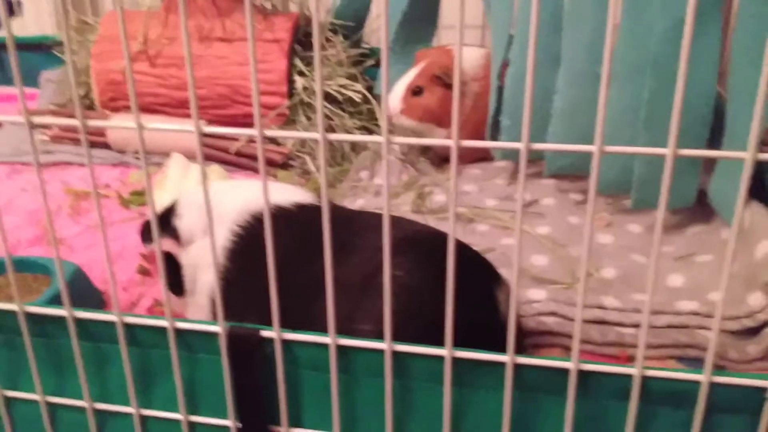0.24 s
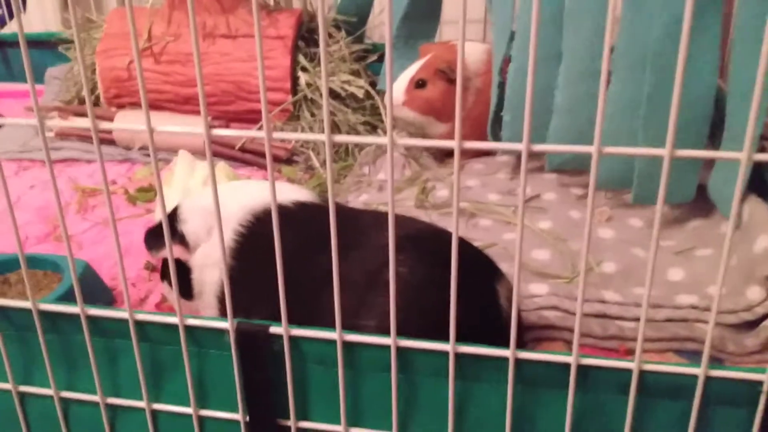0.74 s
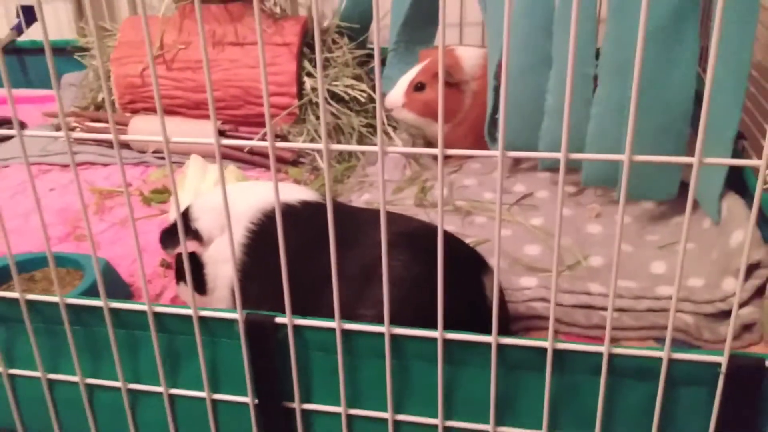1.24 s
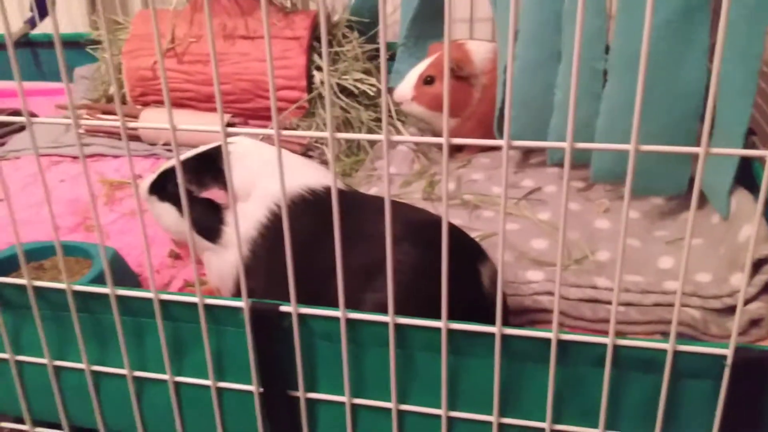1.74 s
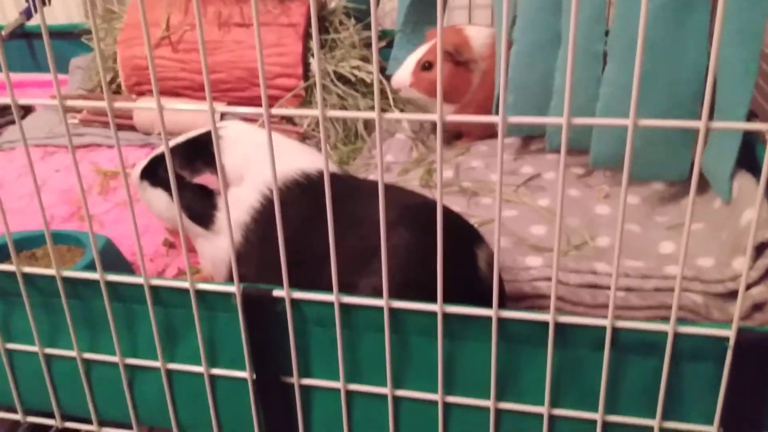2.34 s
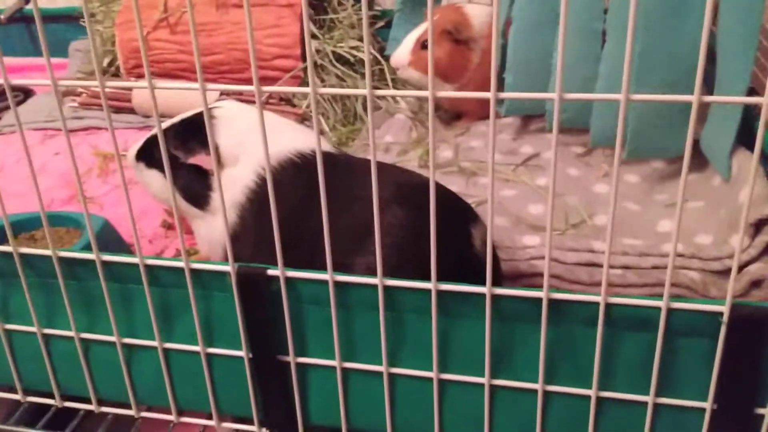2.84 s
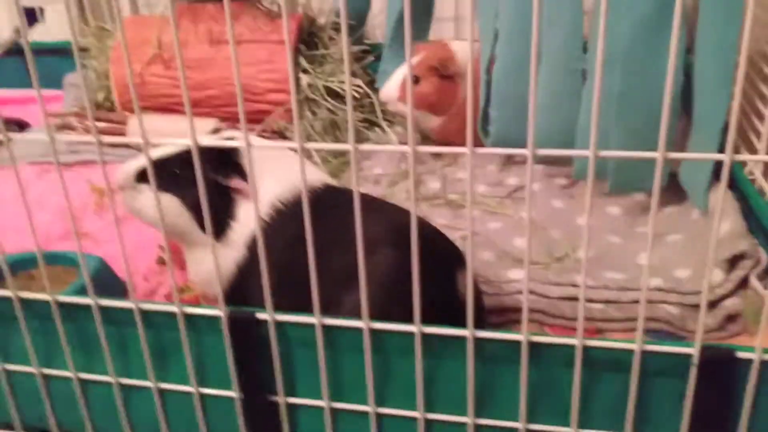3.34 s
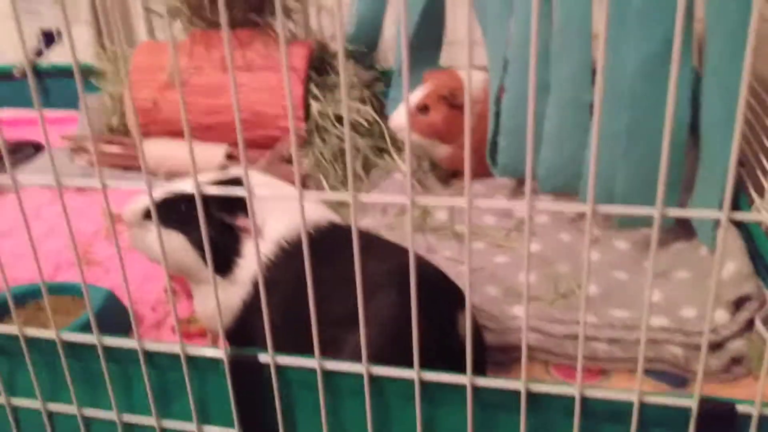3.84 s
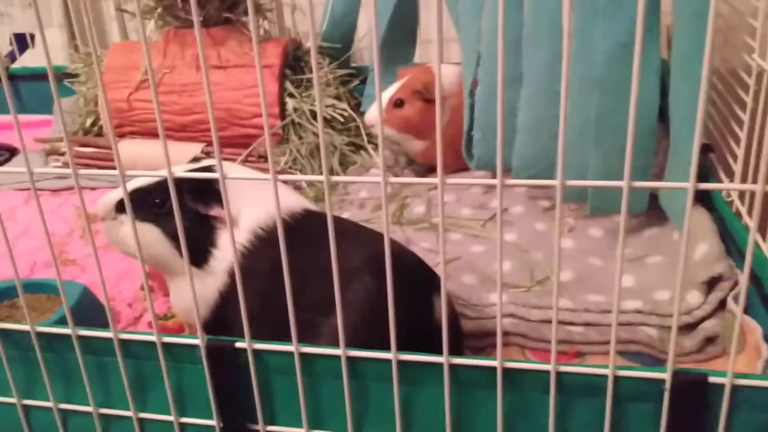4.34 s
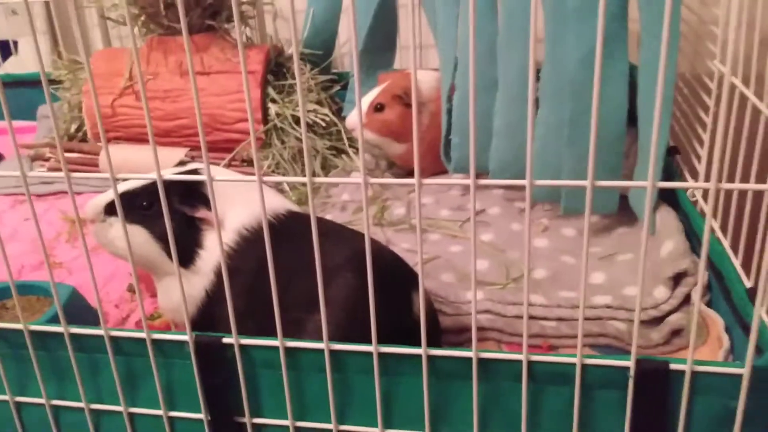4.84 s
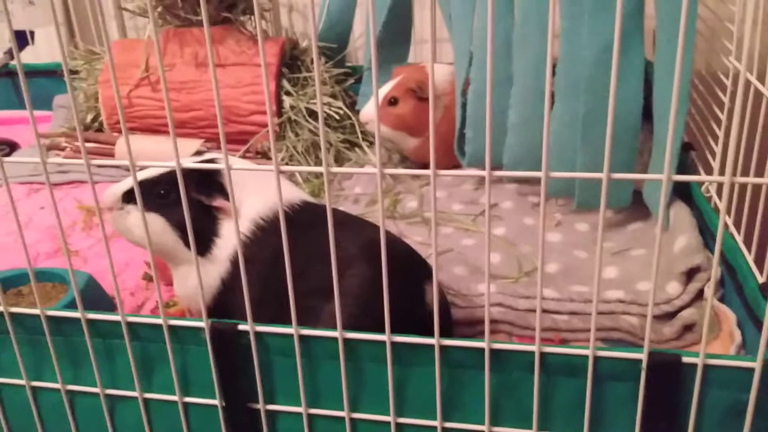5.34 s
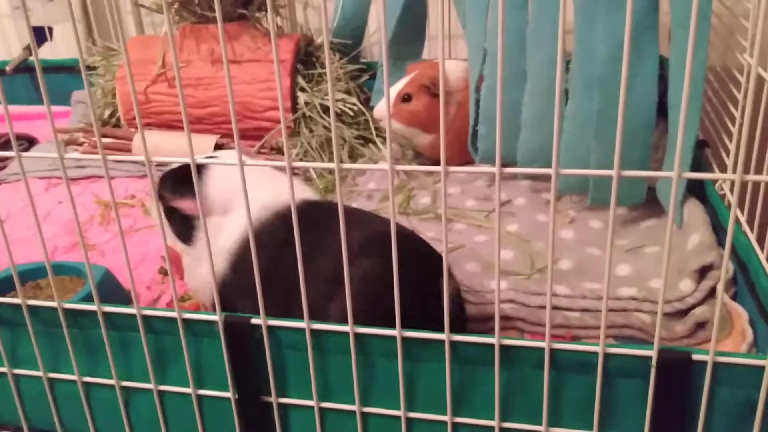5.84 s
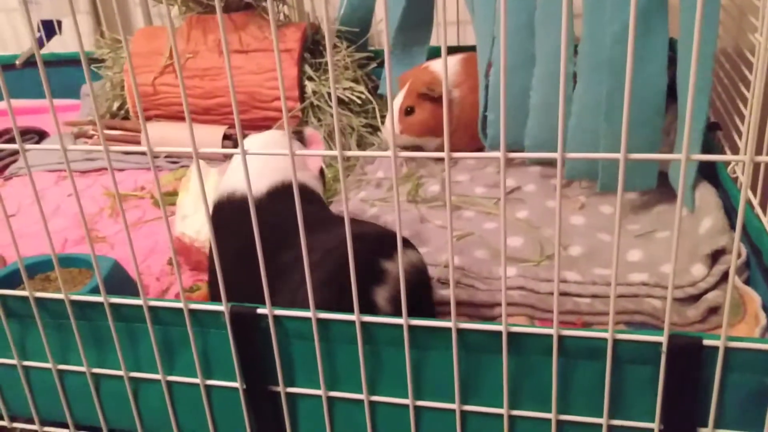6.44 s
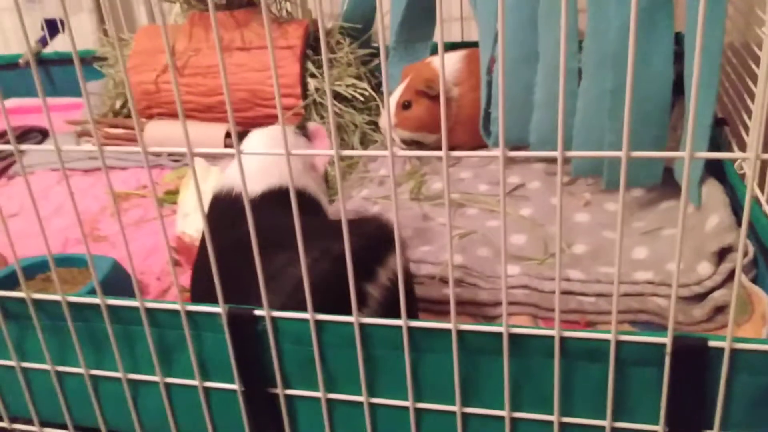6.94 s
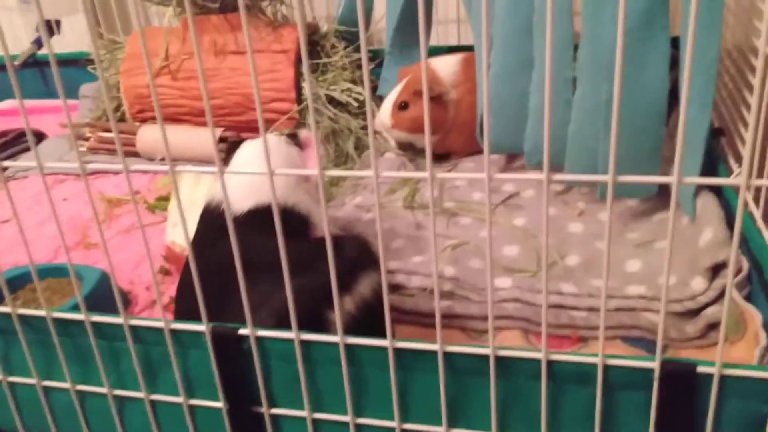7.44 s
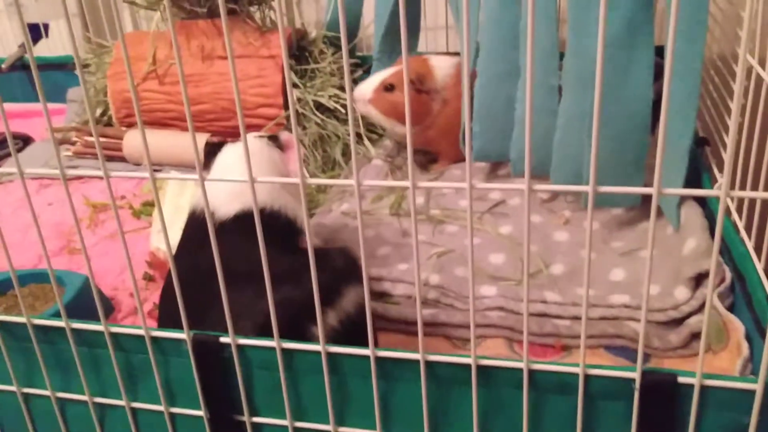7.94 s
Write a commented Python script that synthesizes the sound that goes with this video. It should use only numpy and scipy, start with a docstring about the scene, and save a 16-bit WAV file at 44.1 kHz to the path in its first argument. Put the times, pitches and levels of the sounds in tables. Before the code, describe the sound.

A guinea pig roots through dry hay in a cage, stalks snapping and crackling in two bouts, with soft bedding thuds over faint appliance hum.

```python
"""Dry hay stirred close to the microphone, in two bouts: stalks snap, as bursts of splinter pulses
that excite a resonance. Under the snaps lie a dense crackle of decaying grains and a soft rustle of
shaped noise. Bedding thuds on the cage tray as damped modes, and a few swishes pass as resonant noise.
Behind them an appliance hums as steady sine lines in the hiss of the quiet room."""
import sys
import numpy as np
from scipy import signal
from scipy.fft import irfft
from scipy.io import wavfile
from scipy.ndimage import uniform_filter1d

SR = 44100
rng = np.random.default_rng(int(sys.argv[2]) if len(sys.argv) > 2 else 0)


def wav_out(sig):
    """Save sig, one row per channel (or a flat mono array), as 16-bit PCM at SR to the path in sys.argv[1]."""
    wavfile.write(sys.argv[1], SR, np.round(np.clip(np.atleast_2d(sig).T, -1, 1) * 32767).astype(np.int16))


N = 360426


def gain_of(db):
    """Logarithmic level: converts decibels to an amplitude ratio."""
    return 10 ** (np.asarray(db) / 20)


def evened(x):
    """Power normalization: scales to an rms of 1."""
    return x / np.sqrt(np.mean(x ** 2) + 1e-20)


def read(points, hz):
    """Spectral interpolation: reads a table on a log-frequency axis."""
    f, value = np.transpose(points)
    return np.interp(np.log(hz + 1), np.log(f + 1), value)


def follow(peaks, holds, levels_db, rise_db_per_s, fall_db_per_s, sag_db_per_s=0):
    """Power summation: level in dB of overlapping gestures, each a rise, a hold and a fall."""
    t = np.arange(0, N, 64) / SR
    early = np.c_[peaks] - t
    late = t - np.c_[peaks + holds]
    shape_db = -rise_db_per_s * np.maximum(early, 0)
    shape_db -= fall_db_per_s * np.maximum(late, 0)
    shape_db -= sag_db_per_s * np.maximum(-early, 0)
    power = (gain_of(np.c_[levels_db] + shape_db) ** 2).sum(0) + 1e-14
    return np.interp(np.arange(N) / SR, t, 10 * np.log10(power))


def band(x, lo_hz, hi_hz):
    """Band limitation: causal band-pass along the last axis."""
    edges = np.clip([lo_hz, hi_hz], 20, SR / 2 - 100)
    return signal.sosfilt(signal.butter(2, edges, "band", fs=SR, output="sos"), x)


def add(mix, s, sound, pan=0., lag=0.):
    """Interaural differences: a sound reaches the left port lag samples later, pan/4 dB up;
    the right port gets it 1.5 * pan dB down."""
    for side, (sign, shift) in enumerate([(0.5, lag), (-3.0, 0)]):
        start = max(round(s * SR + shift), 0)
        part = mix[side, start:][:len(sound)]
        part += gain_of(sign * pan / 2) * sound[:len(part)]


def hiss(spectrum, same, lead_s, patchy_db, size):
    """Random-phase synthesis: partly coherent stereo noise with drifting spectral patches, rms 1."""
    frames, hz = 4 * N // size + 5, np.fft.rfftfreq(size, 1 / SR)
    left_re, left_im, own_re, own_im, patches = rng.standard_normal((frames, len(hz), 5)).T
    patches = uniform_filter1d(patches, size=8, axis=0)
    patches = evened(uniform_filter1d(patches, size=8, axis=1))
    left, own = left_re + 1j * left_im, own_re + 1j * own_im
    alike = np.clip(read(same, hz), 0, 1)[:, None]
    delay = np.exp(-2j * np.pi * hz * lead_s)[:, None]  # the left port leads by lead_s
    right = alike * delay * left + np.sqrt(1 - alike ** 2) * own
    z = np.array([left, right]) * gain_of(read(spectrum, hz)[:, None] + patchy_db * patches)
    return evened(signal.istft(z, nperseg=size, noverlap=3 * size // 4)[1][:, :N])


# relative spectrum of the room's hiss: (frequency [Hz], density [dB per Hz])
AIR_SPECTRUM = [(30, 0), (60, 1.5), (95, -8), (140, 5.5), (200, -10), (260, 7.5), (310, -10.5), (380, 0),
                (540, -5.5), (680, 3), (870, 0), (1000, -4), (1500, -2.5), (2300, -1), (3000, -14),
                (5600, -23.5), (9000, -28.5), (13500, -25), (15700, -25), (16100, -50)]
AIR_DB = -59.5  # dB rms, before the port balance
# left-right likeness of the hiss: (frequency [Hz], likeness [0 to 1])
AIR_LIKENESS = [(60, .6), (130, .95), (400, .9), (1500, .6), (3000, .5), (5000, .15)]
# motor hum near multiples of 120 Hz, with side lines 11.6 Hz apart from its turning:
# (frequency [Hz], level [dB rms])
HUM_LINES = [(119.9, -71), (131.6, -71), (143.0, -76), (170.6, -80), (228.4, -72), (239.7, -78),
             (251.5, -76), (263.0, -78), (274.6, -81), (342.8, -80), (359.9, -73), (373.9, -76),
             (404.3, -84), (599.9, -84), (611.3, -83), (634.4, -83), (673.7, -84), (731.4, -82),
             (754.6, -82), (851.3, -84)]


def room_air():
    """Superposition of steady noise and sine lines; both arrive at the left port first."""
    t = np.arange(N) / SR
    air = gain_of(AIR_DB) * hiss(AIR_SPECTRUM, AIR_LIKENESS, lead_s=0.00031, patchy_db=1.7, size=2048)
    out = air * gain_of([[-.6], [.6]])
    arrival = np.array([[0], [.0002]])  # s, left and right
    for (hz, db), start in zip(HUM_LINES, rng.random(len(HUM_LINES))):
        tone = np.sin(2 * np.pi * (hz * (t - arrival) + start))
        out = out + np.sqrt(2) * gain_of(db) * tone
    return out


def cage(x, t60=0.091):
    """Early reflection: tray and walls return sparse taps of random sign, other ones per port."""
    at = np.arange(40, 6000, 20) + rng.integers(0, 20, (2, 298))
    taps = np.zeros((2, 6040))
    decay = gain_of(-60 * at / SR / t60)
    np.put_along_axis(taps, at, rng.choice([-1., 1.], at.shape) * decay, 1)
    return signal.oaconvolve(band(x, 310, 4200), taps / np.linalg.norm(taps[0]), axes=1)[:, :N]


# stalks sliding along the bars: (time at full level [s], hold [s], level [dB])
SWISH_EVENTS = [(1.643, .005, -45), (3.039, 0.027, -47.5), (6.758, 0.014, -47)]
# high resonances of a swish: (frequency [Hz], width [Hz], relative level [dB])
SWISH_RESONANCES = [(5300, 400, -6), (8800, 500, -8), (12900, 800, 0), (14500, 1200, -3)]
SWISH_RISE_DB_PER_S, SWISH_FADE_DB_PER_S = 2300, 450


def swishes():
    """Resonant filtering: friction noise passes through a few high resonances."""
    noise = rng.standard_normal((2, N))
    noise[1] = 0.29 * noise[0] + 1.4 * noise[1]
    rings = 0
    for hz, width, db in SWISH_RESONANCES:
        rings = rings + gain_of(db) * evened(band(noise, hz - width / 2, hz + width / 2))
    s, hold, db = np.transpose(SWISH_EVENTS)
    level = gain_of(follow(s, hold, db, SWISH_RISE_DB_PER_S, SWISH_FADE_DB_PER_S))
    slide = evened(rings + 0.47 * band(noise, 4000, 16000))
    return slide * uniform_filter1d(level, size=400)


# pushes on the tray: (time at the envelope's peak [s], boom level [dB], knock level [dB])
TRAY_PUSHES = [(1.214, -35.5, -50), (1.242, -65, -29.5), (1.336, -39, -36), (1.383, -49, -37),
               (1.577, -60, -32.5), (1.621, -43, -58), (1.681, -43, -30.5), (1.97, -44, -39.5),
               (2.012, -43, -37), (2.062, -35, -32), (2.114, -49, -32.5), (2.425, -48, -31),
               (2.682, -39.5, -53), (2.984, -69, -32.5), (5.255, -39, -40.5), (5.563, -40.5, -34),
               (5.939, -42.5, -62), (6.188, -42, -38)]
# modes of the tray: (nominal frequency [Hz], share of boom against knock [0 to 1], level offset [dB])
TRAY_MODES = [(78, 1, 0), (150, 0.35, -7), (316, 0, -1.5)]
PITCH_SPREAD = 0.16  # relative to the mode: each push lands elsewhere on the tray


def thuds(cycles=0.58):
    """Modal excitation: a push sets off a low cycle or two in each tray mode, which swells and dies."""
    out, t = np.zeros((2, N)), np.arange(4000) / SR
    spots = rng.standard_normal((len(TRAY_PUSHES), len(TRAY_MODES)))
    for (s, boom_db, knock_db), spot in zip(TRAY_PUSHES, spots):
        for (mode_hz, share, db), shift in zip(TRAY_MODES, spot):
            hz = mode_hz * (1 + PITCH_SPREAD * shift)
            rise = cycles / hz
            peak = gain_of(db + share * boom_db + (1 - share) * knock_db)
            swell = t / rise * np.exp(1 - t / rise)
            add(out, s - rise, peak * np.sin(2 * np.pi * hz * t) * swell)
    return out


# strokes through the heap, levels before the mix gains:
# (time at full level [s], hold [s], effort [dB], treble above effort [dB])
HEAP_STROKES = [(0.713, 0.11, -67, -9.5), (1.008, .07, -65.5, -4.5), (1.168, 0.08, -54.5, -10.5),
                (1.281, 0.14, -55, -9), (1.464, .17, -57.5, -10), (1.654, 0.11, -56.5, -8),
                (1.872, .03, -56.5, -13), (1.967, 0.14, -53, -7.5), (2.272, .03, -64.5, -11),
                (2.35, 0.11, -57, -8.5), (2.514, 0.17, -64.5, -3.5), (2.663, 0.07, -56, -12),
                (2.742, .06, -56.5, -4), (2.848, 0.03, -66, -5), (2.942, 0.14, -59.5, -8),
                (4.693, 0.096, -60.5, -5.5), (4.813, 0.047, -64.5, -15), (4.931, 0.11, -53, -7.5),
                (5.174, 0.062, -66.5, -1), (5.238, 0.058, -57, -5), (5.344, 0.14, -66.5, -1),
                (5.519, 0.3, -58, -3.5), (5.847, 0.078, -51, -9), (6.0, 0.11, -61.5, -7.5),
                (6.153, 0.19, -53.5, -10), (6.404, 0.027, -58.5, -11), (6.475, 0.095, -64, -4),
                (6.567, 0.041, -55, -10.5), (6.636, .04, -59, -4), (6.725, 0.1, -56.5, -4),
                (6.87, 0.07, -62.5, -4), (6.98, 0.27, -71.5, -5.5)]
PRESS_DB_PER_S, EASE_DB_PER_S = 600, 212  # how fast a stroke sets in and dies away
SAG_DB_PER_S = 13  # a held stroke tires
SETTLE_DB, SETTLE_DB_PER_S = -9.5, 80  # the heap shifts more softly before and after each stroke
# bass of a -60 dB stroke above its effort; share of the effort that it follows
WEIGHT_DB, WEIGHT_FOLLOWS = 0.5, 0.76


def by_effort(x):
    """Amplitude modulation by band: ring, treble and bass of a texture follow the strokes."""
    s, hold, db, treble_db = np.transpose(HEAP_STROKES)
    weight_db = -60 + WEIGHT_DB + WEIGHT_FOLLOWS * (db + 60)
    # (sign, low edge Hz, high edge Hz, level dB); neighbouring bands alternate in sign to join up
    parts = [(1, 900, 4000, db), (-1, 4000, 17000, db + treble_db), (-1, 45, 900, weight_db)]
    out = 0
    for sign, lo, hi, level_db in parts:
        stroke = gain_of(follow(s, hold, level_db, PRESS_DB_PER_S, EASE_DB_PER_S, SAG_DB_PER_S))
        settle = gain_of(follow(s, hold, level_db + SETTLE_DB, 2 * SETTLE_DB_PER_S, SETTLE_DB_PER_S))
        out = out + sign * evened(band(x, lo, hi)) * np.hypot(stroke, settle)
    return out


# relative spectrum of rubbing stalks: (frequency [Hz], density [dB per Hz])
RUSTLE_SPECTRUM = [(30, -32), (85, 10.5), (200, 10.5), (390, 5), (545, -1.5), (1100, -4.5), (2440, -1.5),
                   (3330, -11), (8100, -17), (13200, -8), (15700, -11), (16100, -48)]


def rustle():
    """Friction noise: stalks rub on each other in flickering lumps, less marked in the treble."""
    same = [(100, 0.92), (500, 0.99), (1500, 0.34), (5000, 0.091)]  # (frequency [Hz], likeness [0 to 1])
    flicker = uniform_filter1d(rng.standard_normal(N), size=300)
    flicker = evened(uniform_filter1d(flicker, size=300))
    rub = by_effort(hiss(RUSTLE_SPECTRUM, same, lead_s=-0.00011, patchy_db=1.5, size=512))
    body, fizz = band(rub, 30, 4000), band(rub, 4000, 17000)
    return gain_of(3.4 * flicker) * body - gain_of(1.9 * flicker) * fizz


def crackle(per_s=330., spread_db=5.0):
    """Random impulse process: small dry breaks across the heap in 24 colours, a few of them large."""
    out, t = np.zeros((2, N)), np.arange(500) / SR
    size = gain_of(spread_db * np.minimum(rng.exponential(1, N), 4))
    size = size * (rng.random(N) < per_s / SR)
    kind = rng.integers(0, 24, N)
    for k, (pitch, pan, lag) in enumerate(rng.random((24, 3))):
        hz = 350 * 13 ** pitch
        grain = np.sin(2 * np.pi * hz * t) * np.exp(-t * hz / 2.76)
        grain += 0.38 * rng.standard_normal(len(t)) * np.exp(-t / 0.0029)  # the tear reaches the treble
        breaks = signal.oaconvolve(size * (kind == k), grain)[:N]
        add(out, .0003, breaks, 6 * (pan - .5), 12 * (lag - .25))
    return by_effort(out)


# stalks that snap: (time [s], ring peak before panning [dB], ring frequency [Hz],
# bite above the ring [dB], fibres above the ring [dB], length [s])
STALK_SNAPS = [(0.7728, -46, 1700, -8, -22, 0.0051), (.7975, -44.5, 2550, -15, -22, 0.0048),
               (1.06, -41, 1860, -3, -11, 0.0019), (1.0743, -44, 910, -15, -17, 0.0017),
               (1.1558, -27, 1290, -14, -18, 0.003), (1.175, -36.5, 1100, -3, -13, 0.0051),
               (1.2438, -24, 2600, -5, -3, 0.0024), (1.2776, -27, 1990, -5, -18, .0016),
               (1.303, -21.5, 2630, -1.5, -2, 0.0017), (1.3251, -16.5, 2520, -6.5, -7.5, 0.0027),
               (1.3693, -18.5, 2350, -3.5, -2.5, 0.001), (1.381, -31, 1610, -10, -18, 0.0025),
               (1.458, -38, 1460, -9, 1, .0016), (1.5114, -35.5, 2120, -10, -11, 0.0042),
               (1.5406, -29.5, 2260, -5.5, -19, 0.0074), (1.5796, -30.5, 2780, -11, 1.5, .0042),
               (1.5927, -28.5, 1900, -13, 2.5, 0.0021), (1.62, -30.5, 940, -5, -8, 0.0031),
               (1.683, -21.5, 1480, -23, -23, 0.0021), (1.6928, -27.5, 2560, -14, -12, 0.0037),
               (1.7076, -21, 2130, -8, -4, 0.0025), (1.7603, -22, 2250, -30, -12, 0.0021),
               (1.8653, -35.5, 1150, -9, -4.5, 0.0037), (1.964, -30.5, 2230, -18, -1, 0.0025),
               (1.9812, -21.5, 2770, -6, -8, .0014), (1.9871, -27, 1900, -26, -19, 0.0027),
               (2.0104, -22.5, 2340, -18, -25, 0.0027), (2.057, -24, 1690, -10, -22, 0.0065),
               (2.0723, -33, 1590, -15, -20, 0.0028), (2.0952, -30.5, 1830, -7, -22, 0.0036),
               (2.109, -27.5, 2560, -16, -1, 0.0022), (2.1127, -24.5, 1500, -15, -14, 0.0029),
               (2.3347, -34.5, 2850, -2, 4, 0.002), (2.351, -41, 2100, -24, -19, 0.0036),
               (2.3672, -24.5, 2900, -4, 1.5, 0.0019), (2.422, -30.5, 985, -11.5, -9.5, 0.0052),
               (2.5014, -47, 2390, 0, 10, .0035), (2.5219, -29.5, 1070, 2.5, 6.5, 0.0022),
               (2.567, -36.5, 1340, -24, -26, 0.0029), (2.6002, -40.5, 2650, -0.5, -5, .0039),
               (2.6721, -31, 2450, -9, -27, .0065), (2.7237, -30.5, 2110, -19, -21, 0.0025),
               (2.7503, -25, 2620, 0.5, -7, 0.0015), (2.7544, -22.5, 1800, -1, -8, 0.0024),
               (2.77, -32, 2730, -12, -4, 0.0034), (2.8171, -34, 1500, -2, 6.5, 0.0031),
               (2.847, -36.5, 2900, 0.5, 5, 0.0034), (2.8899, -34.5, 2050, -8, -26, .0022),
               (2.947, -45.5, 2500, 4, 0, .003), (2.9666, -23.5, 2070, -13, -6, 0.0014),
               (2.9813, -37, 2700, -5, -18, 0.0033), (3.0267, -30.5, 1490, -11, 3.5, 0.0037),
               (4.7234, -40, 2220, -12, -21, 0.00091), (4.759, -31.5, 1820, -6, -4, .0016),
               (4.772, -31, 2320, -17, -20, 0.0041), (4.7992, -37.5, 1830, -15, -18, 0.0036),
               (4.837, -34, 1660, -17, -13, .0023), (4.878, -27, 1200, -21, -33, .003),
               (4.928, -28, 1130, 5.5, 2, 0.0032), (4.9474, -36, 2270, -3, 0, 0.0031),
               (4.9643, -26.5, 1270, -7, -5, 0.0029), (4.97, -35, 2360, 5.5, 3, 0.0037),
               (4.982, -28, 1170, 0, -7, 0.0036), (5.012, -29, 1820, -16, -21, 0.0033),
               (5.046, -24.5, 2030, -17, -10, 0.0016), (5.052, -29, 1220, -21, -9, 0.003),
               (5.2471, -26.5, 2640, -11.5, -8, 0.0038), (5.2832, -34, 1630, -6, -12, 0.0036),
               (5.4044, -39.5, 1070, -6, -2, .004), (5.456, -32.5, 1160, -11, -3, 0.0022),
               (5.5168, -40, 3300, -19, -2, 0.0028), (5.5593, -34, 1560, -32, -17, 0.0035),
               (5.6195, -26, 1480, -30, -3, 0.002), (5.6392, -35, 1530, -15, -3, 0.0021),
               (5.6848, -34, 1700, -23, -12, 0.0038), (5.7146, -30, 1250, -36, -27.5, 0.0022),
               (5.7512, -31, 1580, -12, -17, 0.002), (5.7756, -32.5, 2150, -15, -3.5, 0.0029),
               (5.8437, -44, 2260, -21, -18, 0.0057), (5.8611, -15.5, 2420, -27, -13, 0.0042),
               (5.8942, -25, 2230, -22, -3, 0.0029), (5.907, -24.5, 2050, -10, -11, 0.0012),
               (5.9146, -25.5, 1870, -21, -10, 0.0026), (6.017, -30.5, 2020, -12, -10, 0.0034),
               (6.0529, -23, 2010, -15, -1.5, .0018), (6.14, -31.5, 2280, -9.5, -16, 0.004),
               (6.1587, -26.5, 1620, -5, -3, 0.0044), (6.1793, -21.5, 1240, -24, 6, 0.0026),
               (6.2029, -27, 910, -11, -6, .0025), (6.2444, -33.5, 2210, -9, -19, .002),
               (6.27, -35.5, 1790, -25, -14, 0.0032), (6.298, -32.5, 2580, -11, -8, .0023),
               (6.408, -23, 1300, -25, -7.5, 0.0052), (6.4298, -36.5, 2020, -2, 1, 0.0024),
               (6.529, -43, 3030, 1, 8, 0.0023), (6.5721, -33.5, 940, -14, -23, 0.002),
               (6.635, -38, 1280, -20, -20, 0.0023), (6.6541, -18, 2270, -9, -9, 0.002),
               (6.6621, -30.5, 980, -6, -11, 0.0051), (6.6824, -34.5, 2400, 1, -17, .0017),
               (6.7466, -30, 2540, -10, -14, 0.0064), (6.7924, -30, 2370, -6, 5, 0.0022),
               (6.821, -37, 1250, -4, -9, 0.0042), (6.859, -32.5, 2640, 3, 3, .0025),
               (6.905, -29.5, 2170, -14, -28, 0.0063), (7.044, -31.5, 2480, -36, -27, 0.0027),
               (7.0884, -52, 1220, -19, 6, .0021), (7.217, -49, 1240, -10, -16, 0.0058),
               (7.2561, -46, 1530, -4, 4, 0.0025), (7.5808, -52, 2100, 0, 8, 0.0016)]
# knock of a -30 dB snap above its ring, before a random spread; share of the strength it follows
KNOCK_DB, KNOCK_FOLLOWS, KNOCK_SPREAD_DB = -14, 0.5, 5.5


def snaps():
    """Impulsive excitation of a resonator: a quick run of splinters rings the stalk;
    a bite, a hiss of fibres and a knock go with it."""
    out, t = np.zeros((2, N)), np.arange(1800) / SR
    chances = rng.standard_normal((len(STALK_SNAPS), 3, len(t)))
    for (s, db, hz, bite_db, fibres_db, length), chance in zip(STALK_SNAPS, chances):
        knock_db = KNOCK_DB + (KNOCK_FOLLOWS - 1) * (db + 30) + KNOCK_SPREAD_DB * chance[0, -1]
        rise = np.clip(.3 * length, .0002, .006)
        shape = np.minimum(t / rise, np.exp((rise - t) / (0.81 * length)))
        splinters = chance[0] * (abs(chance[1]) > 1.5) * shape
        splinters[round(rise * SR)] = -.005 / length  # short snaps are one main break, long ones crumble
        ring = band(splinters, hz / 1.16, hz * 1.184) + 0.77 * band(splinters, 1225, 2750)
        torn = splinters + 0.16 * chance[2] * shape
        bite = -band(torn, 3500, 7000)
        fibres = band(torn, 7000, 16000)
        knock = -band(splinters, 200, 900)
        parts = [(ring, 0), (bite, bite_db), (fibres, fibres_db), (knock, knock_db)]
        sound = sum(gain_of(db + above_db) * part / abs(part).max() for part, above_db in parts)
        add(out, s - rise - .0003, sound, 2.4 * chance[1, -1], 2.7 + 2.3 * chance[2, -1])
    return out


def scene():
    """Linear superposition: hay and its reflections in the cage, over the room."""
    hay = snaps() + gain_of(-3.0) * crackle()
    near = hay + gain_of(-8.5) * cage(hay)
    return near + gain_of(3.5) * rustle() + thuds() + swishes() + room_air()


# colour difference of the two ports: (frequency [Hz], left over right [dB])
PORT_COLOUR = [(300, 0.5), (1400, -1), (2800, -0.5), (5600, 2.5), (11000, 1)]
EDGE_HZ = 16500  # upper band limit


def record(dry):
    """Linear filtering: the ports differ a little in colour, the microphone drops the deepest bass,
    and a low-pass limits the band."""
    hz = np.fft.rfftfreq(512, 1 / SR)
    colour_db = np.outer([.5, -.5], read(PORT_COLOUR, hz))
    ports = np.fft.fftshift(irfft(gain_of(colour_db)), axes=1)
    coloured = signal.oaconvolve(dry, ports, axes=1)[:, 256:256 + N]
    thinned = signal.sosfilt(signal.butter(3, 55, "high", fs=SR, output="sos"), coloured)
    low_pass = signal.firwin(511, EDGE_HZ, window=("kaiser", 10), fs=SR)
    return signal.oaconvolve(thinned, low_pass[None], "same")


dry = scene()
out = record(dry)
wav_out(out)
```